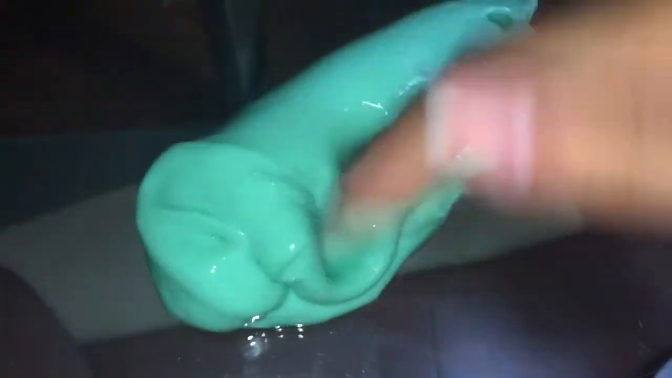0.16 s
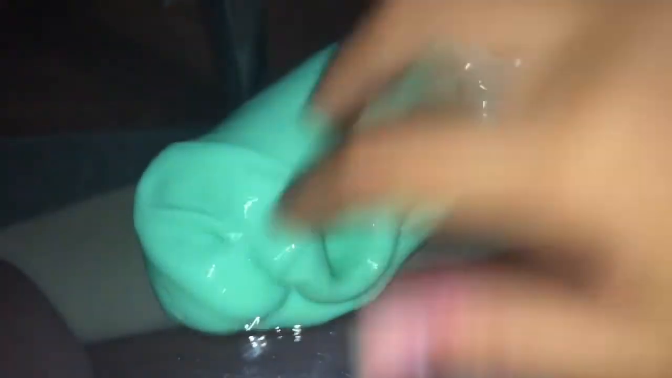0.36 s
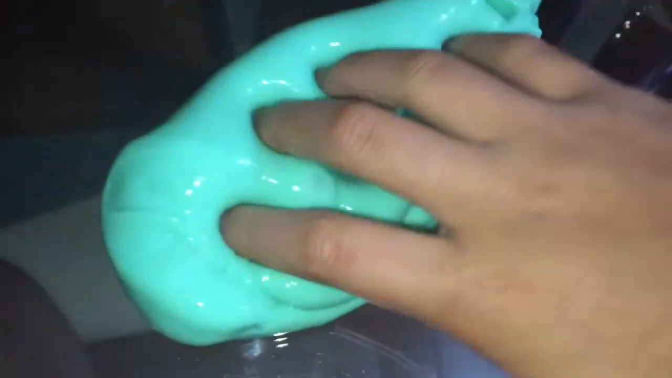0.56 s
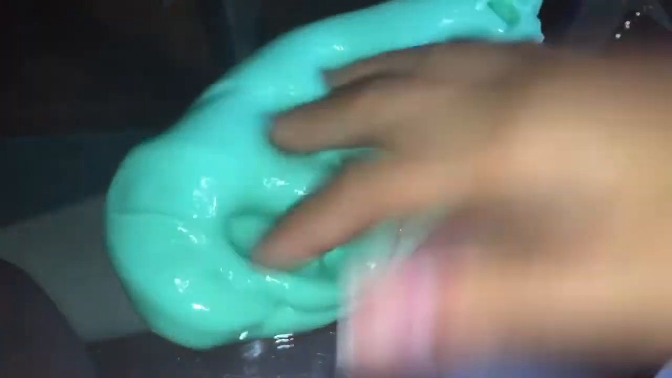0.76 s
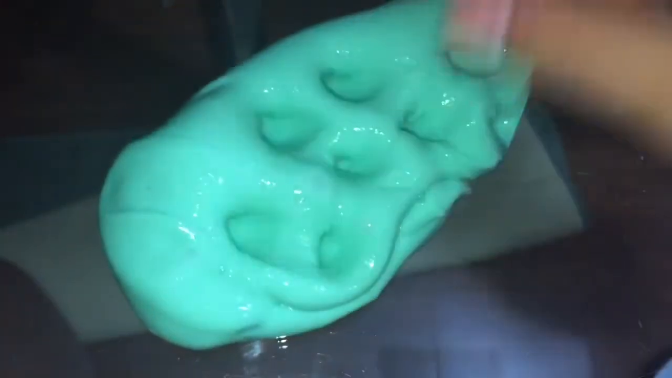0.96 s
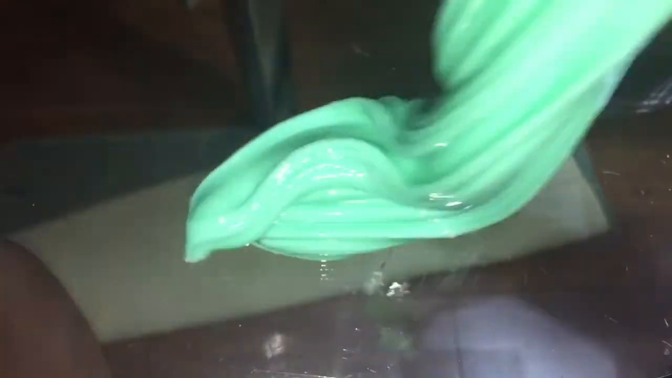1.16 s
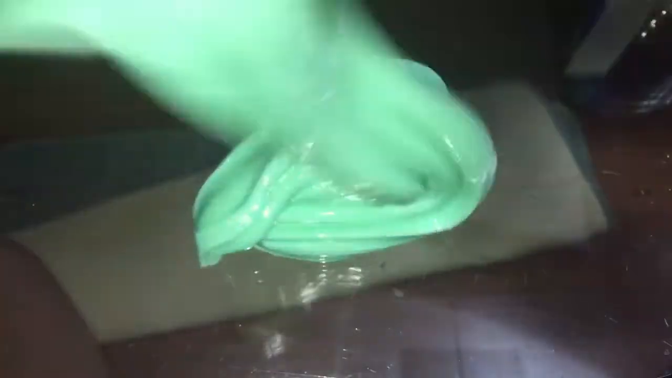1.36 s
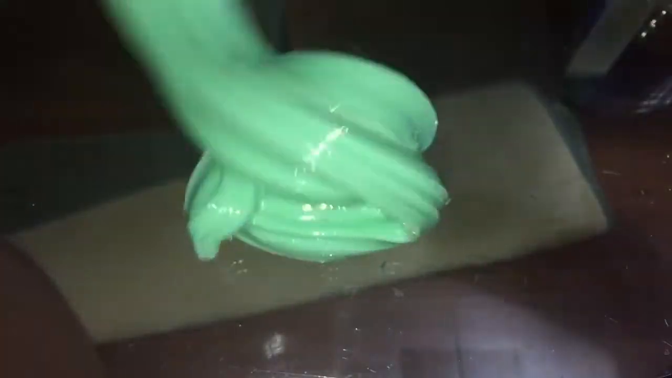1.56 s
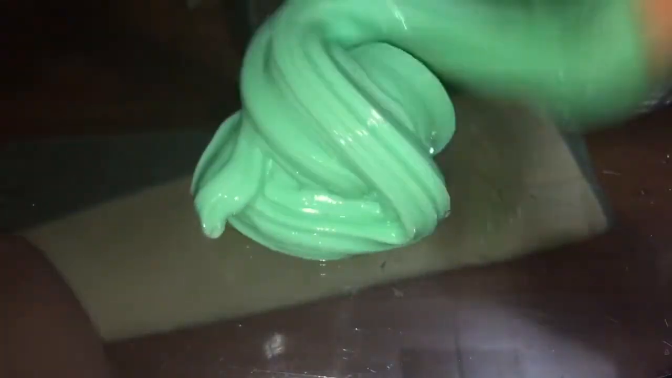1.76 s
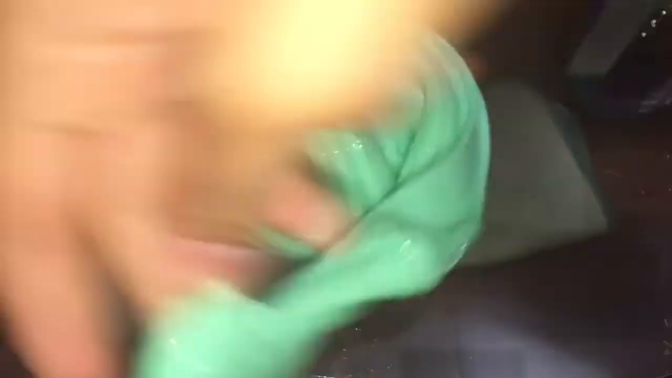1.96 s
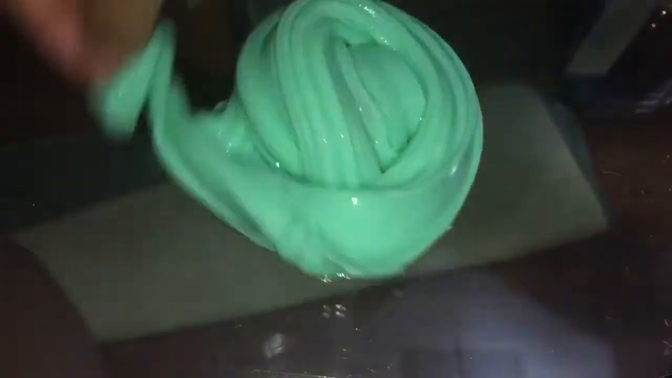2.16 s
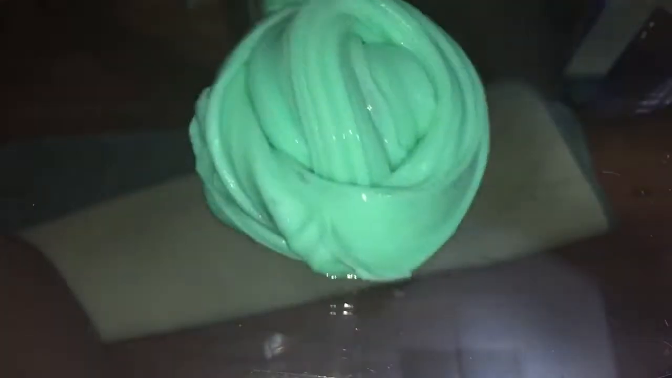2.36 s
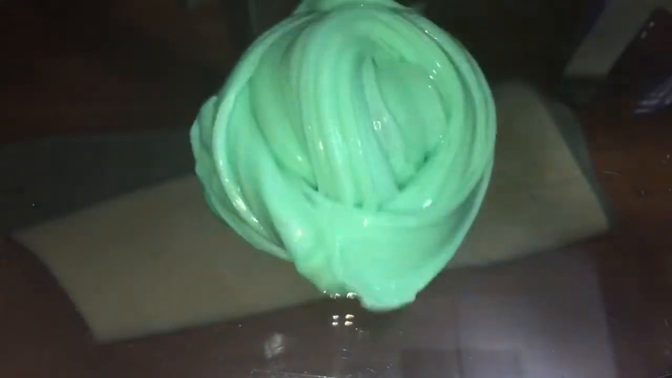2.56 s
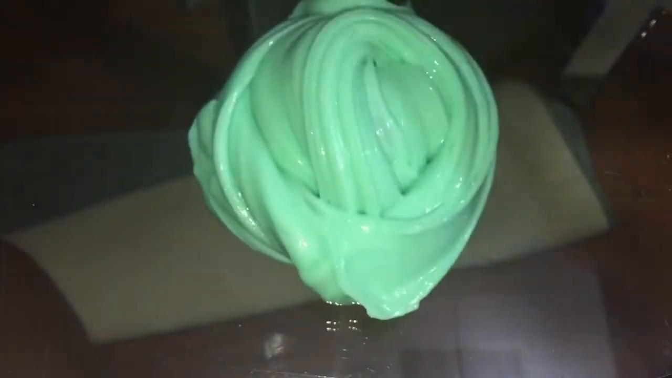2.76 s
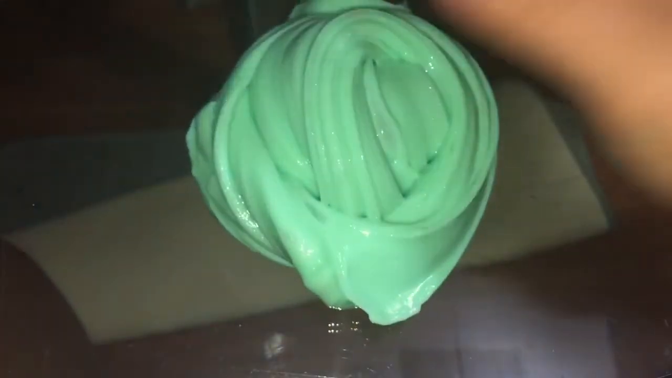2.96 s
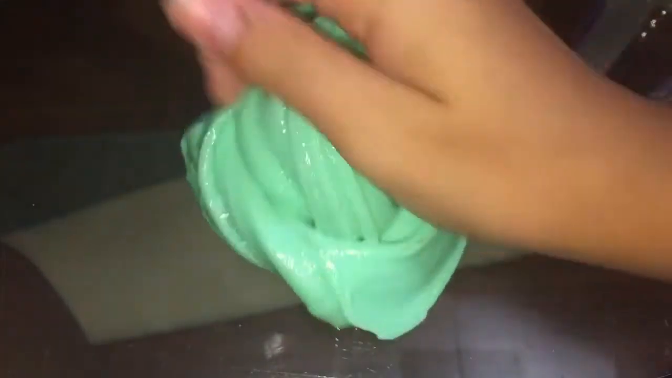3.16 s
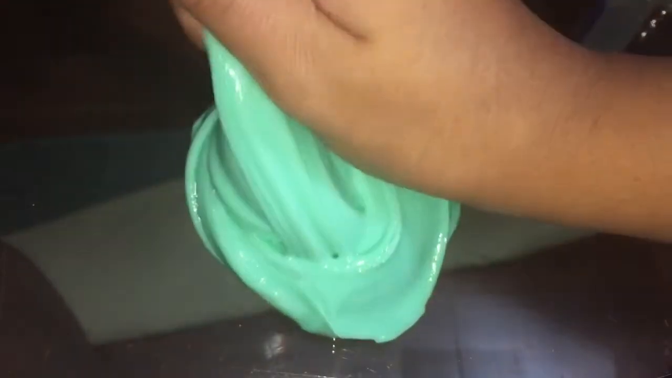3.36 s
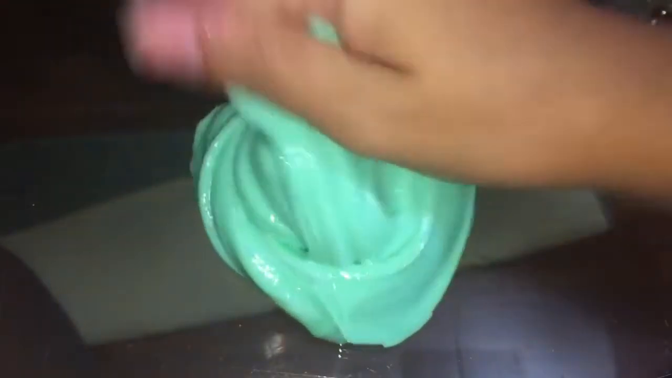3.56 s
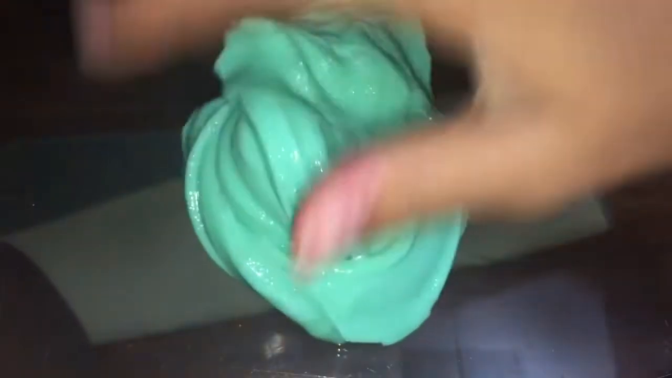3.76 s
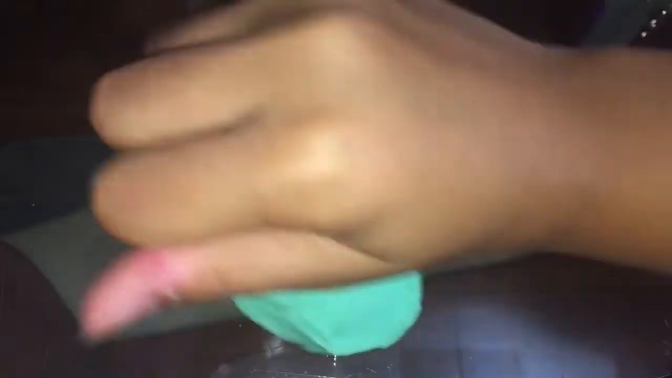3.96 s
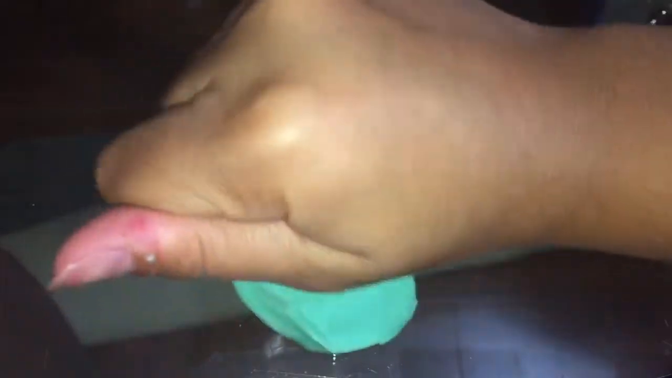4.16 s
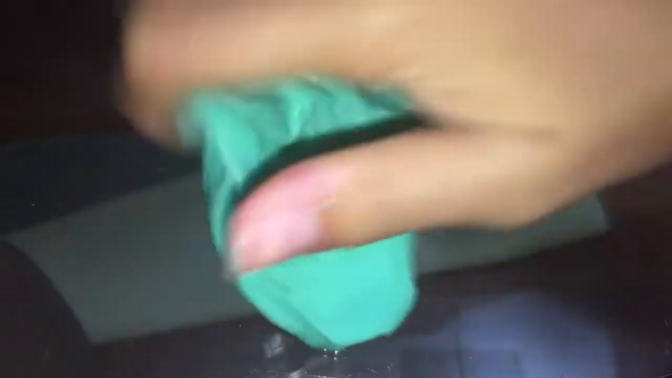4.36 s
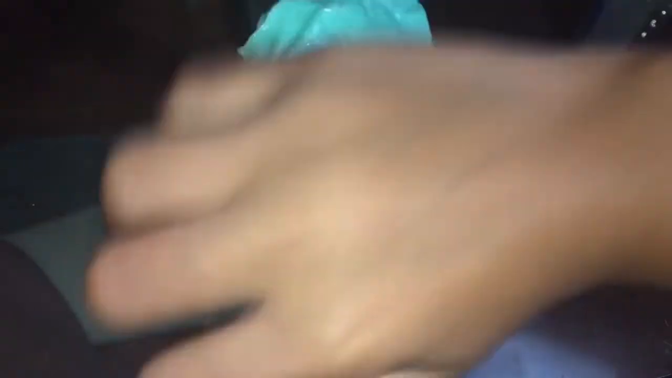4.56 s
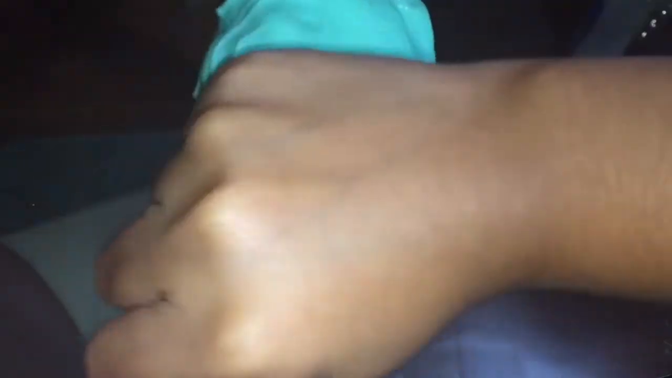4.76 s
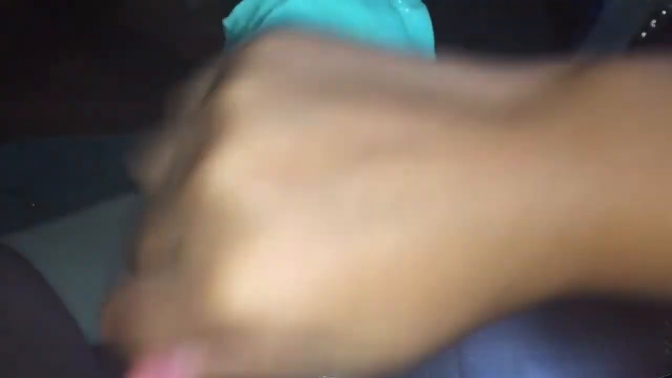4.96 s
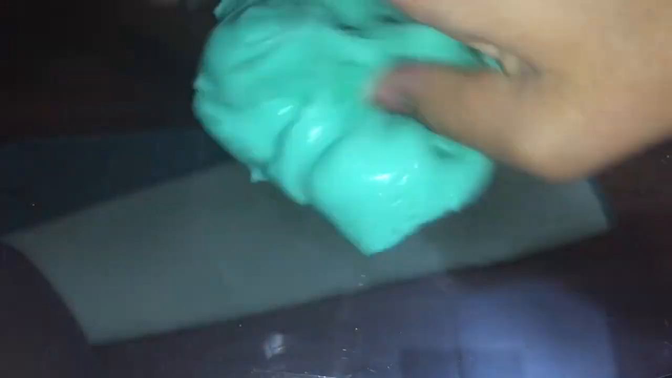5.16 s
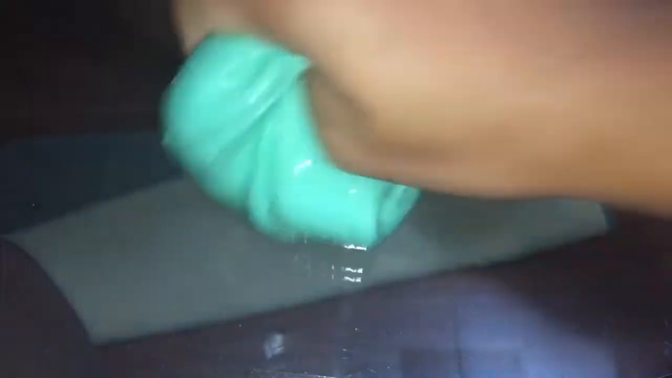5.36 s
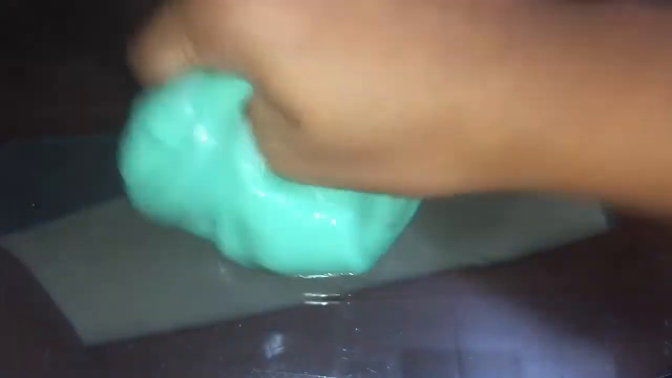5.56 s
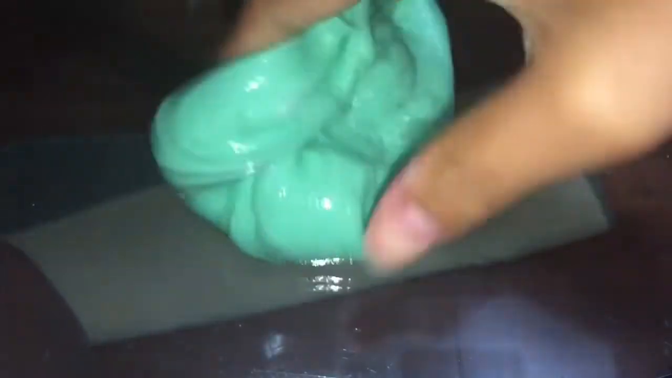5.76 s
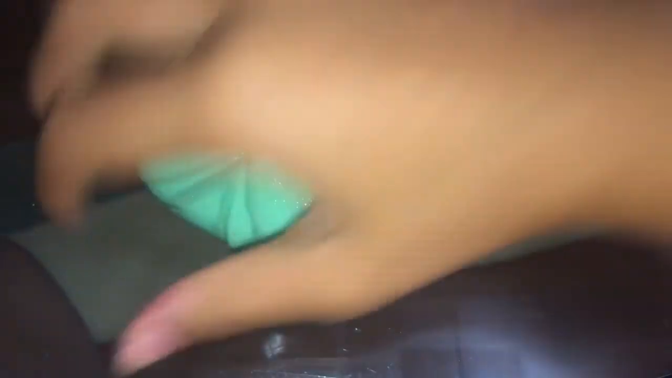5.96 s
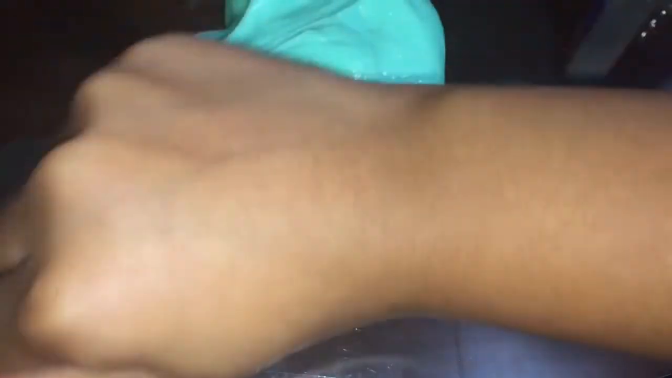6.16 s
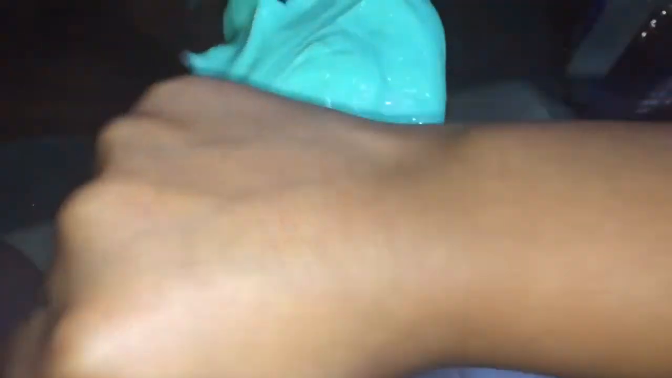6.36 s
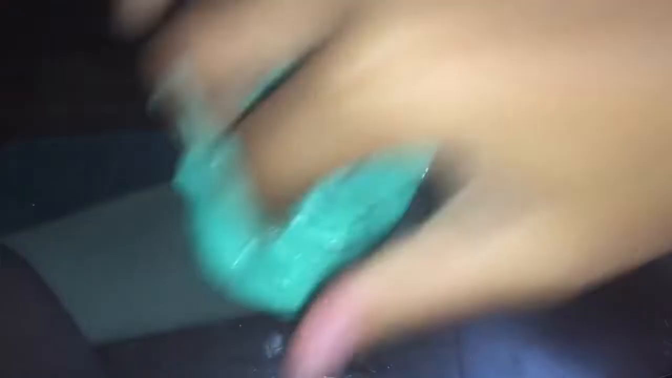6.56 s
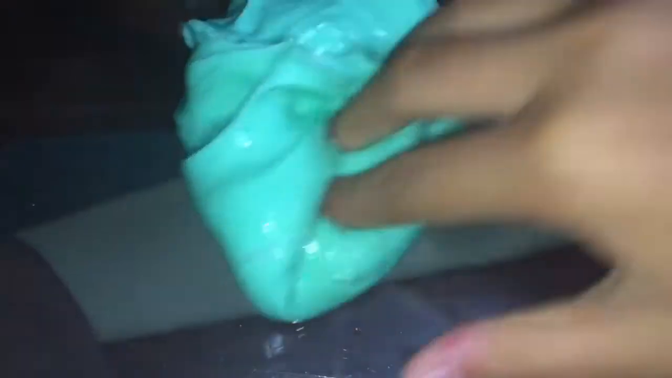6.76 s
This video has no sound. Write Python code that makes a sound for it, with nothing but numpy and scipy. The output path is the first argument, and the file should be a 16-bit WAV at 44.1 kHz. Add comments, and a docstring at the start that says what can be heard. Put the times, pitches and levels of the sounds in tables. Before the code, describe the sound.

Hands poke and knead glossy slime, setting off irregular bursts of overloaded wet snaps and clicks between faint bubble crackle and soft slaps.

```python
"""Hands work wet slime on a glass table, close to a phone in a small room, over quiet hum and hiss.
Loud pops open the scene and return within a second, as film tears and pockets ring; deep holes hum on.
Faint crackle of tiny bubbles follows, then two dense runs of pops with puffs and hissing jets of air.
Dull, wet pats on the table come between later pops; the hardest pats lead into a last loud burst.
The loudest peaks overload the microphone."""
import sys
import numpy as np
from scipy import signal
from scipy.fft import rfft, irfft
from scipy.io import wavfile
from scipy.ndimage import uniform_filter1d

SR = 44100
rng = np.random.default_rng(int(sys.argv[2]) if len(sys.argv) > 2 else 0)


def to_wav(s):
    """Save 16-bit WAV."""
    ch = np.atleast_2d(s).T  # columns
    pcm = np.round(np.clip(ch, -1, 1) * 32767)  # PCM
    wavfile.write(sys.argv[1], SR, pcm.astype(np.int16))


N = 299426

# Air pockets that stand out as they burst. Each row: start in seconds, snap level in dB,
# brightness tilt in dB per octave, pocket pitch in Hz, ring level in dB before the common ring lift.
POCKET_BURSTS = [(0.141, -33, 5, 9600, -39), (.435, -44, -3, 1400, -32.5),
                 (.1508, -29.5, -3.5, 1390, -22.5), (.164, 12.5, 4, 1436, 3.5), (0.1881, 6.5, -1, 967, 4),
                 (.219, -7.5, -1.5, 3500, -14), (0.2216, 2.5, -1, 887, -4), (0.8155, 8, 3.5, 1190, 7.5),
                 (.838, 6, 1, 1200, -5.5), (0.86, -9, -5.5, 12000, -1), (.874, -3.5, -1, 1208, -11),
                 (1.351, -45, -5, 1800, -31), (1.631, -48, -4, 2090, -34.5), (1.8553, -40, 2.5, 2670, -32),
                 (2.209, -38, 0.5, 14350, -24.5), (2.4514, -30, 1.5, 2900, -32.5),
                 (3.135, -35.5, -5.5, 3806, -24), (3.15, -35, -1, 3120, -32.5),
                 (3.277, -24.5, -4.5, 1216, -26), (3.3363, -8.5, -6.5, 1260, -14.5),
                 (3.3381, -14, -2.5, 5830, -2.5), (3.355, -11.5, -7, 1206, -23.5),
                 (3.368, -11, 9, 12370, 2), (3.3901, -5.5, -2, 12400, 0), (3.4067, -0.5, -2, 14360, 0),
                 (3.4204, -3, -6.5, 11660, 9), (3.4307, 9.5, 6.5, 13640, -8), (3.45, 15, 4, 13470, 22.5),
                 (3.4659, -4.5, 1, 5740, 0.5), (3.481, -9, -3.5, 11700, -1), (3.4952, -7, 1, 14500, 0),
                 (3.6231, -18, 0, 1170, -22), (3.6294, -21.5, -3, 2140, -13),
                 (3.6592, -37, -3, 1800, -18.5), (3.6977, -26, 1.5, 5250, -33),
                 (3.9664, -19, 1.5, 8530, -12.5), (4.07, -5, 7, 13450, -15.5), (4.1316, -8.5, 1, 6410, 2),
                 (4.1388, 1.5, .5, 5540, 9), (4.1537, 8, 2.5, 4780, 12), (4.1648, 7.5, -3.5, 2292, -7),
                 (4.172, 12, -0.5, 9850, 12.5), (4.178, 9.5, -2, 1816, 2), (4.181, 7, 2.5, 7110, 11),
                 (4.1905, 5, 1, 5580, 1.5), (4.2097, -8, -2, 5370, 2.5), (4.2367, -3.5, 1.5, 2300, 4.5),
                 (4.2814, -5.5, -1, 12660, -4), (4.724, -26.5, -6, 1880, -16),
                 (4.7632, -11, 0.5, 2060, -17), (4.784, -12, 0, 3630, -6), (4.8028, -4, -1, 6570, -3.5),
                 (4.821, -16.5, -1, 3600, -12), (4.8247, -12.5, -1, 3730, -4), (4.8279, -11, 0, 1904, -5),
                 (4.837, -2.5, 1.5, 13600, -15), (4.843, -7, -2, 3610, -0.5), (4.8503, -.5, 3, 13600, -19),
                 (4.8684, -6, 0, 3570, -1.5), (4.8745, -5.5, -1.5, 2000, -4.5), (4.88, -4, -0.5, 1960, 0),
                 (4.908, 10, 0, 1917, 4.5), (4.914, -9, 1.5, 11000, -8), (5.0366, -14.5, -4, 1104, -18),
                 (5.079, -28, -3, 1970, -17), (5.1161, -29, .5, 6050, -19.5),
                 (5.395, -21.5, -2.5, 3860, -18.5), (5.436, -27, 0.5, 7970, -18.5),
                 (5.4814, -5.5, -1.5, 2480, -0.5), (5.4817, -18.5, 3.5, 7930, -4.5),
                 (5.678, -21, 2, 9260, -13), (5.7147, -16, -3, 4130, -25.5),
                 (5.7218, -12.5, -5, 1603, -7.5), (5.7379, -25, -6, 2140, -7), (5.7612, -31, -9, 1555, -12),
                 (5.7802, -22.5, -.5, 2220, -20), (6.1767, -25.5, 0.5, 2716, -26),
                 (6.3254, 14, 0, 6770, 21), (6.3637, 3, 1.5, 1927, -0.5), (6.3797, 10, -3, 2210, 4),
                 (6.4312, -10, 2.5, 2950, -9.5)]
# Colour of a tearing film. Each row: frequency in Hz, relative level in dB.
TEAR_COLOUR = [(30, -30), (150, -13.5), (350, -8), (600, -1.5), (1000, -4), (2000, 3.5), (3200, 1.5),
               (6500, 0.5), (9000, 0), (10300, -4), (12500, -1), (16000, -4.5)]
# Puffs of air from collapsing hollows. Each row: start in seconds, level in dB, starting pitch in Hz.
AIR_PUFFS = [(.164, -9, 347), (0.1896, -17, 378), (.84, -10, 324), (3.3374, -15.5, 750),
             (3.4078, -5.5, 805), (3.421, -10.5, 800), (3.45, -14.5, 396), (3.4808, -9.5, 380),
             (3.496, -16, 480), (4.1671, -0.5, 520), (4.282, -17, 476), (6.3265, -9.5, 400),
             (6.365, -10.5, 400), (6.382, -4.5, 380)]
# Pats of the mass onto the table. Each row: start in seconds, thud level in dB, body pitch in Hz,
# squelch level in dB.
HAND_PATS = [(.436, -50, 250, -42.5), (1.348, -43, 110.1, -50), (2.246, -44, 259.7, -40),
             (2.453, -44.5, 260, -41.5), (3.623, -46, 390, -31), (4.654, -29, 202, -28),
             (4.666, -22, 217, -14.5), (4.686, -24, 269, -29), (5.0363, -38.5, 482, -33),
             (5.2806, -25, 95, -25.5), (5.3282, -34, 85, -33), (5.7219, -48, 430, -29),
             (5.7617, -28.5, 412, -35), (5.78, -28.5, 599, -29), (6.074, -13.5, 214, -21.5),
             (6.0795, -14.5, 330, -18), (6.0961, -12.5, 271, -18), (6.115, -14.5, 282, -33)]
# Colour of a wet squelch. Each row: frequency in Hz, relative level in dB.
SQUELCH_COLOUR = [(60, -1.5), (200, 5), (700, 1.5), (1500, 1.5), (2400, -13), (5000, -11.5), (9000, -22),
                  (16000, -41.5)]
# Air jets through narrow slits. Each row: start in seconds, level in dB, length in seconds,
# centre in Hz, width at half amplitude in Hz.
AIR_JETS = [(0.84, -24.5, 0.016, 7500, 3500), (3.45, -14, 0.025, 12500, 6020),
            (4.165, -13.5, 0.045, 5000, 8100), (6.326, -10, 0.019, 7600, 2410),
            (6.347, -22, 0.027, 7500, 3010)]
# Colour of the fine crackle. Each row: frequency in Hz, relative level in dB.
CRACKLE_COLOUR = [(200, -12), (700, -9), (1300, -3), (2100, 0), (3200, -6.5), (6500, -1.5), (10000, -3.5),
                  (16000, -7)]
# Colour of the still room. Each row: frequency in Hz, relative level in dB.
AIR_COLOUR = [(15, -47.5), (25, -26), (40, -6), (59, 4), (72, -2), (92, -9), (120, -12), (256, -15),
              (335, -17), (575, -21.5), (1190, -23.5), (2110, -24), (2610, -26), (8590, -33),
              (16000, -39.5)]
# Bands of the room's reflections. Each row: centre in Hz, level in dB before the send gain,
# t60 of the late tail in seconds.
ROOM_BANDS = [(100, -9, 0.21), (303.8, -4.5, 0.37), (700, -8.5, 0.25), (1260, -6, 0.33), (2457, -8, 0.17),
              (4500, -10, 0.24), (7500, -11, .28), (11000, -9.5, 0.19), (15210, -19, 0.29)]
# Modes of the table under a pat. Each row: frequency in Hz, level in dB against the thud, t60 in seconds.
TABLE_MODES = [(153, -11, 0.038), (207, -21, 0.044), (349, -12.5, 0.21), (433, -15, 0.091),
               (581, -11.5, 0.086), (826, -25, .09), (1170, -16, 0.12), (1340, -32, 0.24)]
# Finger holes and deep folds that keep humming after they open. Each row: start in seconds,
# pitch in Hz, level in dB, t60 in seconds.
HUMMING_HOLLOWS = [(0.166, 1620, -35, 0.5), (0.193, 937, -22.5, 0.16), (0.202, 1097, -26.5, 0.23),
                   (0.224, 880, -22.5, 0.16), (.224, 737, -23.5, 0.15), (.817, 1153, -11, 0.2),
                   (0.828, 1165, -25, 0.49), (0.841, 275, -25.5, 0.27), (.82, 890, -23, 0.31)]
# Swells of crackle. Each row: time of full level in seconds, hold in seconds,
# swell level in dB (the crackle lies a fixed step below it).
CRACKLE_SWELLS = [(0.089, .015, -51), (0.172, 0.054, -30), (.82, 0.068, -32), (1.344, 0.031, -45),
                  (1.808, .015, -50.5), (2.492, 0.031, -46.5), (3.264, 0.043, -36.5), (3.397, 0.037, -22.5),
                  (3.632, 0.08, -33), (4.03, 0.085, -40.5), (4.162, 0.035, -26), (4.334, 0.051, -34.5),
                  (4.678, 0.11, -41.5), (4.82, 0.096, -30.5), (5.047, 0.0735, -34.5), (5.248, .04, -50.5),
                  (5.391, 0.077, -43), (5.512, 0.029, -37.5), (5.681, 0.059, -28.5), (6.168, 0.12, -43),
                  (6.336, 0.077, -23.5), (6.516, 0.053, -34)]

AIR_DB = -52
TOP_HZ = 16100
# a pocket rings longer the lower it is: t60 of the smallest (s), extra t60 (s) of one at POCKET_HZ
RING_S, BIG_RING_S, POCKET_HZ = .0057, .012, 1000
# lesser pockets: rate, level over the swell, scatter either way, ring against snap before the ring lift
SMALL_POPS_PER_S, SMALL_POP_DB, SMALL_SPREAD_DB, SMALL_RING_DB = 50, 4.5, 3, 1
SMALL_LOW_HZ, SMALL_HIGH_HZ = 1690, 10700
# a swell rises quickly and falls more slowly; between swells a faint ticking rests at a floor
RISE_DB_PER_S, FALL_DB_PER_S, REST_DB = 600, 340, -64
SQUELCH_T60_S = .085


def undb(db):
    """Level law: decibels to amplitude gain."""
    return 10 ** (np.asarray(db) / 20)


def fade(t, t60):
    """Exponential damping: 60 dB down after t60."""
    return np.exp(-np.log(1000) * t / t60)


def unit(x):
    """Power normalisation: scale to rms 1."""
    return x / np.sqrt(np.mean(x ** 2))


def add(out, s, x):
    """Superposition: mix x into out from time s on."""
    i = max(int(s * SR), 0)
    out[i:i + len(x)] += x[:max(len(out) - i, 0)]


def colour(x, points, tilt_db=0, knee_hz=900):
    """Spectral shaping: filter x by (Hz, dB) points, tilted per octave above the knee; rms 1."""
    octave = np.log2(np.maximum(np.fft.rfftfreq(len(x), 1 / SR), 1))
    hz, db = np.transpose(points)
    tilted = db + tilt_db * np.log2(np.maximum(hz / knee_hz, 1))
    gain = undb(np.interp(octave, np.log2(hz), tilted))
    return unit(irfft(rfft(x) * gain, len(x)))


def noise(points, tilt_db=0, size=8192):
    """Random excitation: coloured noise of rms 1."""
    return colour(rng.standard_normal(size), points, tilt_db)


def smooth_noise(count, size):
    """Slow random motion: a moving average of noise over size samples, rms 1."""
    return unit(uniform_filter1d(rng.standard_normal(count), size=size))


def sweep(pitch):
    """Frequency modulation: phase is the running integral of pitch."""
    return 2 * np.pi * np.cumsum(pitch) / SR


def seconds(size=8192):
    """Time axis of one short event."""
    return np.arange(size) / SR


def pops(rows, tear_t60=0.0088, swell_s=0.0004, wobble=0.08, rise=0.081, fold_db=-19, fold_t60=0.012,
         before_db=-24, before_t60=0.015, upper_db=-3, upper_t60=0.004, ring_lift_db=2):
    """Cavity resonance: tearing noise, then a damped pocket whose pitch rises as its mouth widens."""
    out, t = np.zeros(N), seconds(4096)
    for s, snap_db, bright_db, hz, ring_db in rows:
        tear = noise(TEAR_COLOUR, bright_db, size=len(t))
        snap = tear * fade(t, tear_t60)
        # small folds beside the tear ring briefly, higher for brighter snaps
        fold_octaves = bright_db / 6 + rng.uniform(-1.5, 1.5, (4, 1))
        fold_hz = np.minimum(4200 * 2 ** fold_octaves, TOP_HZ)
        folds = np.sin(2 * np.pi * fold_hz * t).sum(axis=0) * fade(t, fold_t60)
        decay = fade(t, RING_S + BIG_RING_S * (POCKET_HZ / hz) ** 2)
        soft_wall = smooth_noise(len(t), 20)
        phase = sweep(hz * (1 + rise * (.5 - decay) + wobble * soft_wall))
        # a lopsided pocket has a second, quickly damped mode above the first; high pockets go without
        upper = undb(upper_db) * np.sin(phase * rng.uniform(1.0, 2.1)) * fade(t, upper_t60)
        upper = upper * (hz < TOP_HZ / 2)
        ring = (np.sin(phase) * decay + upper) * (1 - np.exp(-t / swell_s))
        burst = undb(snap_db) * (snap + undb(fold_db) * folds)
        add(out, s, burst + undb(ring_db + ring_lift_db) * ring)
        # a faint noise swells just before each burst
        before = undb(min(snap_db, 0) + before_db) * tear * fade(t[::-1], before_t60)
        add(out, s - t[-1], before)
    return out


def small_pops(count=24):
    """Random failure: lesser pockets burst at uneven gaps while a crackle swell holds, louder in a louder one."""
    rows = []
    for s, hold, swell_db in CRACKLE_SWELLS:
        for k, (slip, strength, tilt, pitch) in enumerate(rng.random((count, 4))):
            after = (k + slip) / SMALL_POPS_PER_S
            if after < hold:
                db = swell_db + SMALL_POP_DB + SMALL_SPREAD_DB * (2 * strength - 1)
                hz = SMALL_LOW_HZ * (SMALL_HIGH_HZ / SMALL_LOW_HZ) ** pitch
                rows.append((s + after, db, 6 * (tilt - .5), hz, db + SMALL_RING_DB))
    return rows


def puffs(low_hz=60, fall_s=0.0023, push_t60=0.0072, low_db=-13, low_t60=0.12):
    """Pressure pulse: with each puff a low thump falls quickly in pitch and fades near 60 Hz."""
    out, t = np.zeros(N), seconds()
    onset = 1 - np.exp(-t / 0.00027)
    size = (fade(t, push_t60) + undb(low_db) * fade(t, low_t60)) * onset
    for s, db, hz in AIR_PUFFS:
        pitch = low_hz + (hz - low_hz) * np.exp(-t / fall_s)
        add(out, s, undb(db) * size * np.sin(sweep(pitch)))
    return out


def jets(flutter_db=3):
    """Jet turbulence: air hisses in a resonant band through a slit whose wet lips flutter."""
    out, t = np.zeros(N), seconds()
    for s, db, length, hz, width in AIR_JETS:
        detune = (np.fft.rfftfreq(len(t), 1 / SR) - hz) / (width / 2)
        hiss = unit(irfft(rfft(rng.standard_normal(len(t))) / (1 + detune ** 2)))
        lips = undb(flutter_db * smooth_noise(len(t), 70))
        swell = np.sqrt(np.sin(np.pi * np.minimum(t / length, 1)).clip(0))
        add(out, s, undb(db) * hiss * lips * swell)
    return out


def pats(thud_t60=0.041):
    """Impact on a damped body: a thud and dull wet squelch, with the table's modes faint beneath."""
    out, t = np.zeros(N), seconds()
    table = sum(undb(db) * np.sin(2 * np.pi * hz * t) * fade(t, t60) for hz, db, t60 in TABLE_MODES)
    onset = 1 - np.exp(-t / 0.00045)
    for s, db, hz, squelch_db in HAND_PATS:
        thud = np.sin(2 * np.pi * hz * t) * fade(t, thud_t60) + table
        squelch = noise(SQUELCH_COLOUR) * fade(t, SQUELCH_T60_S)
        add(out, s, (undb(db) * thud + undb(squelch_db) * squelch) * onset)
    return out


def hollows(waver=.016):
    """Air-column resonance: a deep finger hole rings on softly, its pitch wavering with its slack walls."""
    out, t = np.zeros(N), seconds(16384)
    for s, hz, db, t60 in HUMMING_HOLLOWS:
        walls = smooth_noise(len(t), 300)
        phase = sweep(hz * (1 + waver * walls))
        add(out, s, undb(db) * np.sin(phase) * fade(t, t60))
    return out


def crackle_swell_db():
    """Level envelope: each swell of crackle rises, holds and falls; the loudest at any moment prevails."""
    t, db = np.arange(N) / SR, REST_DB
    for s, hold, swell_db in CRACKLE_SWELLS:
        rising = RISE_DB_PER_S * np.maximum(s - t, 0)
        falling = FALL_DB_PER_S * np.maximum(t - s - hold, 0)
        db = np.maximum(db, swell_db - rising - falling)
    return db


def crackle(level_db=-4.5, spread_db=4, cycles=13, glide=.12, fizz_db=-6, count=9000):
    """Bubble resonance: countless tiny bursts, each fizz and a short rising ring, swell and fall together."""
    out, t = np.zeros(N), seconds(400)
    when, pitch, size, life = rng.random((count, 4)).T[:, :, None]
    hz = 600 * 2 ** (4 * pitch)
    # each bubble rings for a like number of cycles, so high ones die sooner
    decay = fade(t, np.minimum(cycles * (.5 + life) / hz, t[-1]))
    phase = 2 * np.pi * hz * np.cumsum(1 + glide * (1 - decay), axis=1) / SR
    ring = np.sin(phase) * decay * np.sqrt(hz / 2000)
    fizz = undb(fizz_db) * rng.standard_normal((count, len(t))) * fade(t, 0.0054)
    # few bubbles are loud, most are faint
    strength = undb(spread_db * np.minimum(-np.log(1 - size), 4))
    grains = strength * (ring + fizz)
    for s, grain in zip(when[:, 0] * N / SR, grains):
        add(out, s, grain)
    return colour(out, CRACKLE_COLOUR) * undb(crackle_swell_db() + level_db)


def room(x, first_s=0.004, early_db=-7, early_t60=0.29, size=32768):
    """Reverberation: dense reflections from table and walls, each band decaying at its own rate."""
    t, f = seconds(size), np.fft.rfftfreq(size, 1 / SR)
    white, response = rfft(rng.standard_normal(size)), 0
    onset = np.clip(t / first_s - .5, 0, 1)
    centres = [row[0] for row in ROOM_BANDS]
    for share, (hz, db, t60) in zip(np.eye(len(ROOM_BANDS)), ROOM_BANDS):
        tail = (fade(t, t60) + undb(early_db) * fade(t, early_t60)) * onset
        # neighbouring bands cross-fade between their centres
        band = irfft(white * np.interp(f, centres, share))
        response = response + undb(db) * band * tail / np.sqrt(np.sum(tail ** 2))
    return signal.fftconvolve(x, response)[:N]


def still_air():
    """Stationary noise: the quiet hum and hiss of the room."""
    return undb(AIR_DB) * noise(AIR_COLOUR, size=N)


def scene():
    """Superposition of direct slime sounds, their reverberation and the still room."""
    slime = pops(POCKET_BURSTS) + pops(small_pops()) + jets() + pats() + crackle()
    air_push = puffs()
    # puffs are felt close by and hardly reach the walls
    echo = room(undb(-4.5) * slime + undb(-15.0) * air_push)
    return (slime + air_push + hollows() + echo + still_air())[None]


def record(dry, ceiling=1.0):
    """Overload and band limit: the phone clips the loudest bursts and cuts the top."""
    clipped = np.clip(dry, -ceiling, ceiling)
    low_pass = signal.ellip(8, .1, 50, TOP_HZ, fs=SR, output="sos")
    return signal.sosfiltfilt(low_pass, clipped)


dry = scene()
out = record(dry)
to_wav(out)
```